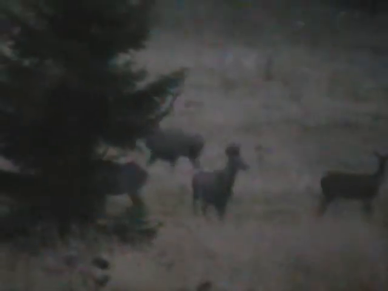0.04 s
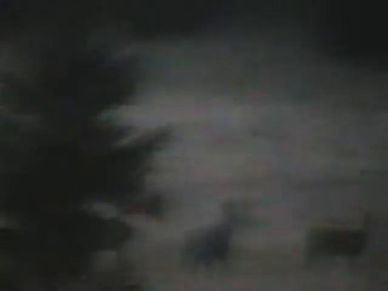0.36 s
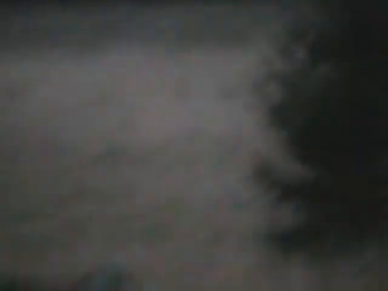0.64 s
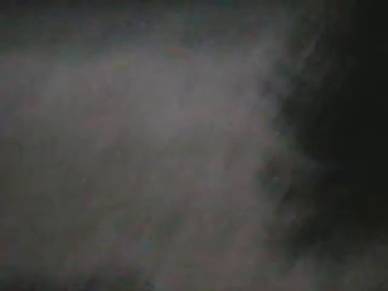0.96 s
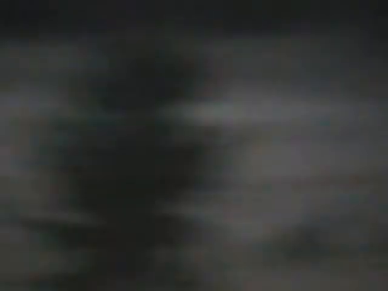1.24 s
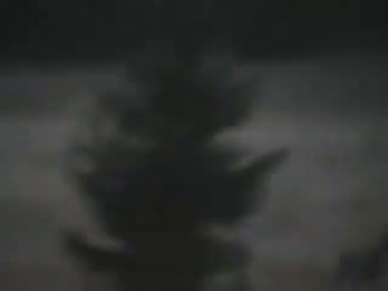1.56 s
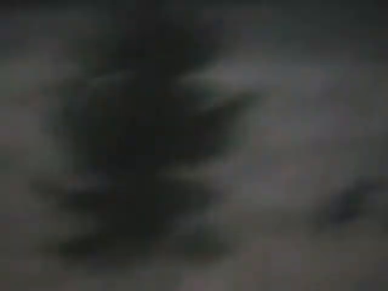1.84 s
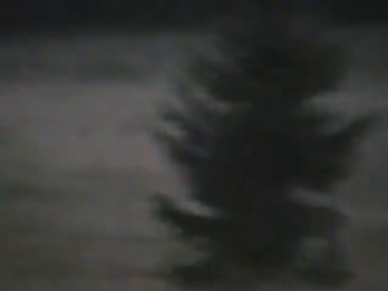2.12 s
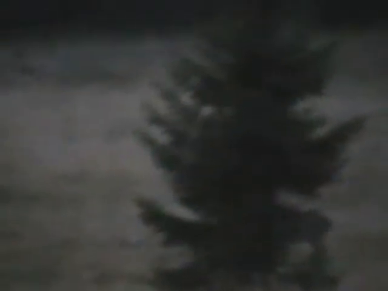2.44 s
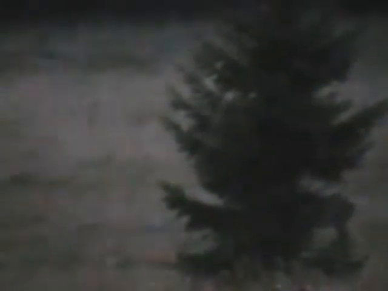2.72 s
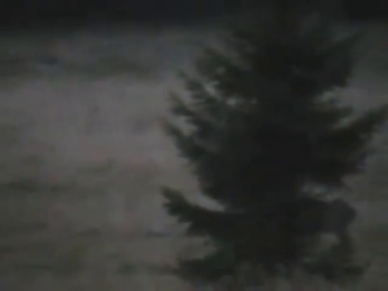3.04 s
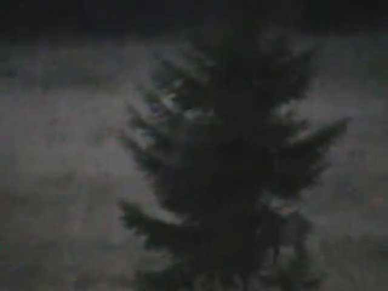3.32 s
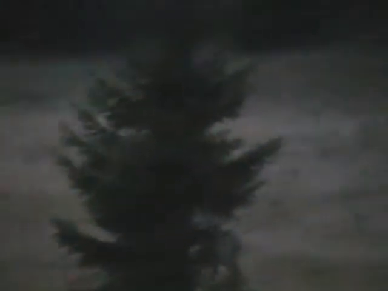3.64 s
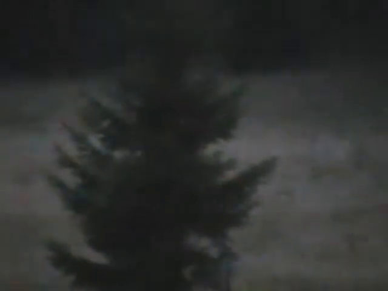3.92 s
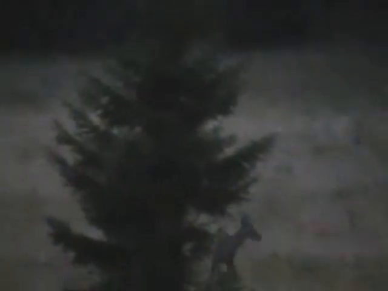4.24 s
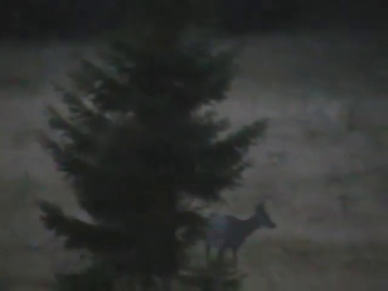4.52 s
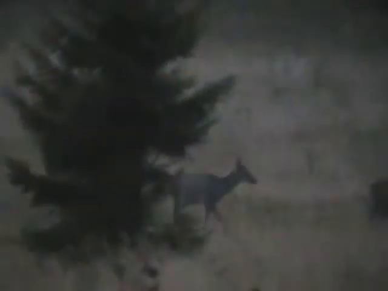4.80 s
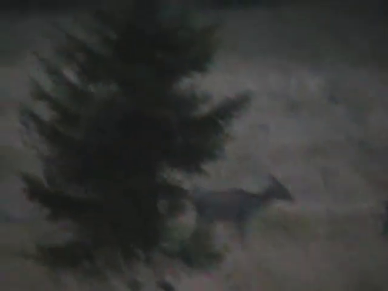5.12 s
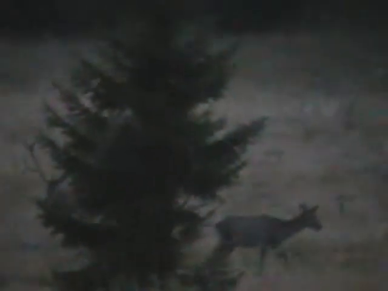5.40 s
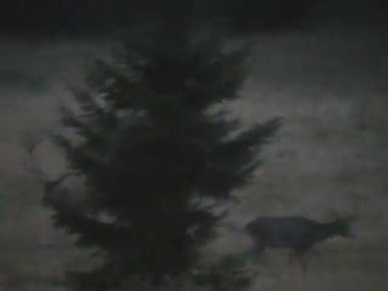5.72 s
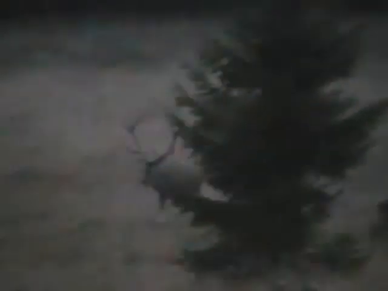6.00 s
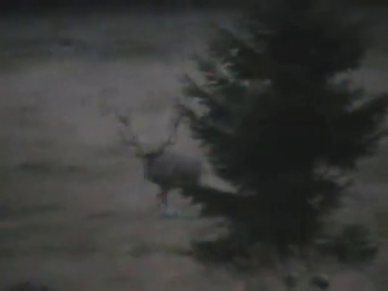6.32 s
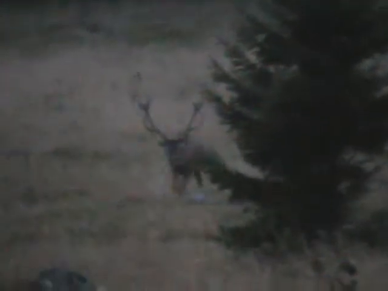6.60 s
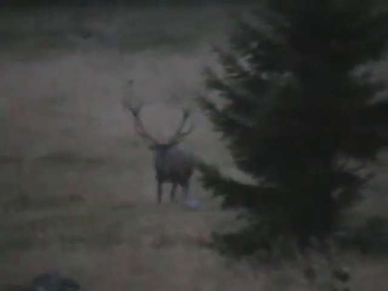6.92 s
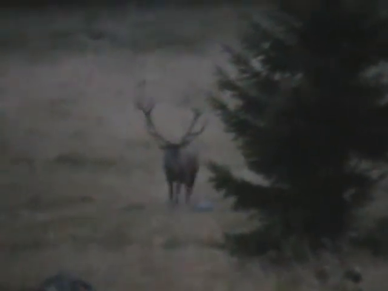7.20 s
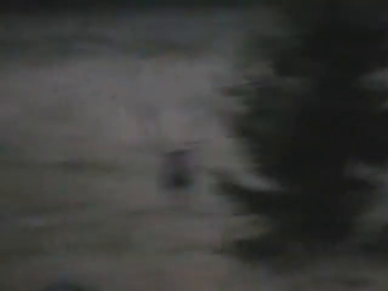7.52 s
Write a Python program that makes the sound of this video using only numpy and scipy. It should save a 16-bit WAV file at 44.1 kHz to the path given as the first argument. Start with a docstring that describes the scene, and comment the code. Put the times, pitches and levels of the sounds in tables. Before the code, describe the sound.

Camcorder handling knocks and faint bird whistles in a quiet meadow, followed by a brief creaky deer call over soft whirr and hiss.

```python
"""A hand-held camcorder's tape drive whirrs and ticks; hands bump and rub its resonant housing.
A far bird whistles thinly over a quiet dusk meadow with deer. Then a close creaking rasp swells and
fades: strokes of stick-slip pulses ring narrow resonances, with soft low gliding tones underneath.
A few light knocks follow."""
import sys
import numpy as np
from scipy import signal
from scipy.fft import rfft, irfft, next_fast_len
from scipy.io import wavfile

SR = 44100
rng = np.random.default_rng(int(sys.argv[2]) if len(sys.argv) > 2 else 0)


def bounce(signal):
    """Save signal as a 16-bit WAV file at the path given by the first command-line argument."""
    frames = np.transpose(np.atleast_2d(signal))
    limited = np.clip(frames, -1, 1)
    pcm = np.round(limited * 32767).astype(np.int16)
    wavfile.write(sys.argv[1], SR, pcm)


N = 341775
TIME = np.arange(N) / SR

# creak strokes: t/s, length/s, level/dB, swell/dB, treble/(dB/octave), first slip rate/Hz,
# last slip rate/Hz, unevenness/0-1
CREAK_STROKES = [(2.881, .2, -59.5, -1, -6, 66.1, 64.6, 0.038),
                 (3.0892, 0.07, -52.5, -9, -12, 72.2, 72.1, 0.036),
                 (3.209, 0.081, -55, 12, 2, 131, 142.3, 0.66), (3.2903, .012, -36.5, -1, 1.5, 72, 72, 0),
                 (3.305, 0.079, -42, 0, 0.5, 73.14, 70.9, 0.0037),
                 (3.3889, 0.053, -41.5, 0, -4.5, 138.2, 123.4, .1),
                 (3.4501, 0.022, -41, -4, -4, 122.4, 116.4, 0.077),
                 (3.4751, 0.025, -40, 4, 2, 113.3, 101.1, .02),
                 (3.5038, 0.047, -46.5, -8, -1.5, 97.2, 85.2, .05),
                 (3.5589, 0.07, -44.5, 3, -2, 84.6, 77, 0.0094),
                 (3.6345, 0.047, -46, -12.5, -1.5, 75.7, 73.9, 0.16)]
# creak resonances, main and nasal: f/Hz, width/Hz, gain/dB
RASP_MODES = [(1578, 13, -4), (1671, 38, 3.5), (1880, 32, 0), (1945, 28, -0.5), (2020, 47, -1),
              (2317, 27, 2), (2470, 67, -7), (2643, 23, -5), (2743, 20, -4.5), (3136, 57, -9.5),
              (3308, 17, -9), (3623, 72, -16.5), (4100, 33, -15.5), (4470, 49, -18.5), (4880, 110, -20.5),
              (5650, 85, -29), (6160, 320, -25)]
NOSE_MODES = [(867, 74, -15), (1190, 33, -11)]
# path of the creak's bright resonance: t/s, f/Hz, gain/dB
BITE_PATH = [(3.29, 4570, -24), (3.41, 4350, -24), (3.495, 5350, -18.5), (3.53, 4970, -31),
             (3.689, 5030, -34)]
# gliding notes: t/s, length/s, first f/Hz, last f/Hz, relative level/dB
SQUEAL_NOTES = [(2.872, .26, 1080, 935, -65), (2.88, .27, 1790, 1600, -61), (2.875, .23, 2320, 1950, -60.5)]
SINGING_NOTES = [(3.33, 0.068, 2760, 2780, -54), (3.443, .15, 2352, 2300, -48),
                 (3.604, 0.057, 2590, 2675, -52), (3.635, 0.08, 2750, 2810, -57)]
GROAN_NOTES = [(3.691, 0.18, 496, 485, -56), (3.856, 0.131, 480, 444, -60)]
LOW_NOTES = [(2.866, 0.069, 180.4, 167, -66), (3.077, 0.13, 153, 187, -70), (3.325, 0.25, 438, 331, -69.5),
             (3.512, 0.15, 185.6, 153.5, -59), (3.665, 0.1, 162.5, 211, -66.5),
             (3.929, 0.14, 268, 164.8, -74.5)]
BIRD_NOTES = [(0.876, 0.17, 7860, 7440, -66), (1.011, 0.18, 7670, 7230, -65),
              (1.146, 0.11, 7050, 6500, -58), (1.552, 0.075, 7570, 7400, -62.5),
              (1.682, 0.069, 7480, 7350, -65.5), (1.772, .11, 7200, 7140, -68.5),
              (1.942, 0.061, 7400, 7450, -68), (2.397, 0.68, 7600, 7030, -75)]
# knocks on the housing: t/s, peak level/dB, low f/Hz, high f/Hz, click re peak/dB
HOUSING_KNOCKS = [(.312, -30.5, 900, 1970, -33), (.396, -30, 885, 5770, -21),
                  (0.4601, -15.5, 295, 1370, -20), (0.477, -24, 254, 1370, -28),
                  (.502, -25.5, 220, 1260, -15), (.593, -30.5, 2420, 3400, 2.5),
                  (0.672, -33, 700, 2200, -16), (0.741, -31.5, 882, 6100, -24), (0.754, -28, 524, 2400, -8),
                  (.799, -29.5, 710, 3000, -11), (.840, -16.5, 326, 1390, -5), (.859, -19.5, 169, 865, -7),
                  (0.8607, -26, 1200, 4970, 0.5), (0.862, -17, 487, 1900, -16),
                  (1.237, -34.5, 704, 4130, -12), (1.452, -37.5, 350, 1170, -7),
                  (1.621, -27.5, 247, 1380, -8.5), (1.818, -47, 284, 450, -23),
                  (1.904, -26, 1060, 2690, -24), (3.655, -37, 477, 790, -23),
                  (4.211, -36.5, 200, 3000, -27), (4.917, -41.5, 300, 4030, 0),
                  (5.743, -41.5, 276, 503, -30), (5.750, -32.5, 515, 770, -14),
                  (5.955, -51.5, 350, 650, -20), (7.71, -40.5, 226, 1020, -9)]
# resonances of the housing and of a hard contact edge: f/Hz, width/Hz, gain/dB
HOUSING_MODES = [(211, 54, 7.5), (394, 410, 8.5), (787, 220, 2.5), (1060, 100, 1.5), (1376, 30, 5),
                 (1680, 490, 7.5), (2180, 300, -6), (3050, 1600, -1.5), (3800, 72, -1), (5560, 510, 5),
                 (9300, 730, -3)]
EDGE_MODES = [(3660, 740, 4), (4100, 380, -11), (5930, 690, -8.5), (8560, 2600, -13), (11800, 2500, -16)]
# small parts ringing after a knock: t/s, f/Hz, level/dB, decay/s
PART_RINGS = [(.593, 4190, -33.5, 0.003), (0.839, 1100, -13.5, 0.0022), (0.8624, 1500, -16.5, 0.0014),
              (0.859, 94, -45, 0.012), (1.621, 3120, -29.5, 0.0012), (5.750, 760, -56.5, 0.049)]
# finger slides: t/s, length/s, relative level/dB, low-pass f/Hz
FINGER_SLIDES = [(0.18, 1.92, -62.5, 6040), (0.351, 0.068, -45.5, 4970), (0.386, 0.12, -49.5, 9000),
                 (0.566, 0.21, -49.5, 9000), (0.88, 0.11, -57, 8000), (0.946, 0.016, -47.5, 9000),
                 (1.026, 0.077, -49, 7900), (1.33, 0.19, -60, 8300), (3.662, 0.14, -50.5, 2440),
                 (3.758, 0.048, -53.5, 2610)]
# fingertip brushes and palm rubs: t/s, length/s, relative level/dB
TIP_BRUSHES = [(.823, 0.0074, -57), (0.858, 0.0026, -51), (0.956, 0.011, -55)]
PALM_RUBS = [(0.2, 1.55, -68), (0.43, 0.26, -54), (0.95, 0.26, -59), (1.315, 0.24, -57.5),
             (3.661, 0.19, -56), (4.322, 0.61, -69.5), (7.3, 1.2, -70.5)]
# noise spectra of fingers, cupped palm, drive whirr, hiss and port rumble: f/Hz, relative level/dB
FINGER_SPECTRUM = [(190, -6), (500, 3.5), (750, 1.5), (1200, 5), (1850, 3.5), (2400, -1.5), (4200, -9.5),
                   (7000, -11.5), (15000, -16)]
PALM_SPECTRUM = [(45, -29), (125, -21), (200, -7), (290, -7.5), (370, -5.5), (480, -2), (560, -7.5),
                 (700, -12.5), (1100, -22.5)]
WHIRR_SPECTRUM = [(15, -54), (25, -25.5), (119, -14), (140, -14), (178, -13.5), (505, -9), (592, -11),
                  (977, -8.5), (1240, -9.5), (1320, -3.5), (1750, -11), (1970, -9), (3000, -10.5),
                  (3900, -51), (6600, -120)]
HISS_SPECTRUM = [(1760, -13), (3000, -17), (3310, -1.5), (3890, -3.5), (4630, 0), (4930, -5.5),
                 (5290, -7.5), (6260, -2.5), (6760, -7), (7350, -5.5), (9010, -9), (10900, -6.5),
                 (11800, -10), (13300, -10.5), (16000, -14.5)]
RUMBLE_SPECTRUM = [(25, -16), (150, -1.5), (1500, -3.5), (4000, -13.5)]
# wavering gear whines: f/Hz, width/Hz, level/dB
GEAR_BANDS = [(533.5, 34, -80.5), (1351, 98, -87), (1982, 89, -75.5), (3980, 86, -79), (5040, 90, -78)]
# drive ticks: first t/s, period/s, f/Hz, width/Hz, decay/s, level/dB
DRIVE_TICKS = [(.0345, .04, 4926, 117, 0.012, -64.5), (.036, .04, 4140, 840, 0.0065, -63.5),
               (0.036, .2, 6160, 290, 0.0061, -61), (0.0015, .2, 5000, 4000, 0.0035, -59)]
# tones of the head drum and beating gears, and of the electronics: f/Hz, level/dB
DRUM_TONES = [(150, -81.5), (1338, -71.5), (1349.5, -76), (1650, -75), (1950, -79.5), (2250, -79)]
CIRCUIT_TONES = [(9900, -92), (10503, -82), (11100, -81.5), (12301, -91), (12898, -86), (13501, -83),
                 (14099, -94), (14702, -97), (15628, -86.5)]


def creak_stroke(stroke, scatter_db=5, jitter=.24, grit=.032, grit_decay_s=.014):
    """Stick-slip: sharp slips, each dragging a little grit, ring the resonances."""
    start_s, length_s, db, swell_db, treble_db_per_octave, first_hz, last_hz, uneven = stroke
    along = progress(start_s, length_s)
    push_db = swell_db * (along - .5)
    moving = (TIME >= start_s) & (TIME <= start_s + length_s)
    rate_hz = (first_hz + (last_hz - first_hz) * along) * np.exp(jitter * uneven * drift(150))
    slip_count = np.ceil(np.cumsum(moving * rate_hz) / SR)
    onsets = np.flatnonzero(np.diff(slip_count) > 0)
    slip_db = push_db[onsets] + scatter_db * uneven * rng.standard_normal(200)[:len(onsets)]
    slips = np.zeros(SR // 2)
    slips[onsets - onsets[0]] = from_db(slip_db)
    drag = signal.lfilter([1], [1, -np.exp(-1 / (grit_decay_s * SR))], slips + 1e-18)
    slips += grit * rng.standard_normal(len(slips)) * drag
    bright = bite(slips, start_s) + rasp(slips, treble_db_per_octave)
    out = np.zeros(N)
    out[onsets[0]:][:len(slips)] = butter(bright, 4, [1400, 7200], "band") + body(slips, NOSE_MODES)
    power = np.mean(moving * from_db(2 * (db + push_db)))
    return rms_one(out) * np.sqrt(power)


def rasp(slips, treble_db_per_octave, tilt_from_hz=1700):
    """Close modes swing in opposition, leaving deep valleys between clusters."""
    out, sign, previous_hz = 0, 1, 0
    for hz, width_hz, db in RASP_MODES:
        if hz < 1.1 * previous_hz:
            sign = -sign
        tilt_db = treble_db_per_octave * max(np.log2(hz / tilt_from_hz), 0)
        out += sign * from_db(db + tilt_db) * resonate(slips, hz, width_hz)
        previous_hz = hz
    return out


def bite(slips, start_s, width_hz=300):
    """Bright contact resonance; climbs as the creak tightens."""
    path_s, path_hz, path_db = np.transpose(BITE_PATH)
    now_s = start_s + TIME[:len(slips)]
    radius = np.exp(-np.pi * width_hz / SR)
    phasor = np.exp(2j * np.pi * np.cumsum(np.interp(now_s, path_s, path_hz)) / SR)
    baseband = signal.lfilter([1 - radius], [1, -radius], slips / phasor + 1e-18)
    return from_db(np.interp(now_s, path_s, path_db)) * 2 * np.real(phasor * baseband)


def squeal(throb_depth=.69):
    """Sinking partials throb at the first stroke's initial slip rate."""
    partials = gliding_tones(SQUEAL_NOTES, waver=.006, flutter_db=2, bend=.7, arch=.5)
    start_s, *_, slip_hz, _, _ = CREAK_STROKES[0]
    return partials * (1 + throb_depth * np.sin(2 * np.pi * slip_hz * (TIME - start_s)))


def singing():
    """Almost clean tones, as of slips in step with one resonance."""
    return gliding_tones(SINGING_NOTES, waver=.003, flutter_db=1.5, arch=.6)


def groan():
    """Rough hollow tones as the creak lets go."""
    return gliding_tones(GROAN_NOTES, waver=.06, flutter_db=3.5, arch=.6)


def tree_echo(x, gain_db=-8.5, t60_s=2.3, top_hz=1750):
    """Many weak, dull reflections off the trees."""
    tail = rng.standard_normal(SR) * from_db(-60 * TIME[:SR] / t60_s)
    wet = signal.fftconvolve(x, tail / np.linalg.norm(tail))[:N]
    return from_db(gain_db) * butter(wet, 4, top_hz)


def knocks(samples=8192, click_top_hz=4880):
    """Short pushes, each in its own band, ring the housing and small parts; hard edges click."""
    out = np.zeros(N + samples)
    push = signal.unit_impulse(samples) + 1e-18
    click = butter(body(push, EDGE_MODES), 1, click_top_hz)
    click /= np.abs(click).max()
    for start_s, db, low_hz, high_hz, click_db in HOUSING_KNOCKS:
        knock = body(butter(push, 2, [low_hz, high_hz], "band"), HOUSING_MODES)
        knock /= np.abs(knock).max()
        out[round(start_s * SR):][:samples] += from_db(db) * (knock + from_db(click_db) * click)
    age_s = TIME[:samples]
    for start_s, hz, db, decay_s in PART_RINGS:
        envelope = from_db(db) * np.exp(-age_s / decay_s) * (1 - np.exp(-age_s * hz)) ** 2
        out[round(start_s * SR):][:samples] += envelope * np.sin(2 * np.pi * hz * age_s)
    return out[:N]


def hands(finger_gain_db=-5.5, palm_gain_db=-1.5, resting_grip_db=-78):
    """Fingers slide, tips brush brightly; the palm rubs dully and never quite rests."""
    skin = friction(FINGER_SPECTRUM, grain_db=2) + crackles()
    fingers = sum(pressure(rub, attack_s=.014, release_s=.12) * butter(skin, 2, top_hz)
                  for *rub, top_hz in FINGER_SLIDES)
    brushing = sum(pressure(rub, attack_s=.0045, release_s=.0022) for rub in TIP_BRUSHES)
    tips = brushing * noise_band(hz=8300, width_hz=11000)
    palm_power = sum(pressure(rub, attack_s=.029, release_s=.086) ** 2 for rub in PALM_RUBS)
    grip = from_db(palm_gain_db) * np.sqrt(palm_power) + from_db(resting_grip_db)
    return tips + from_db(finger_gain_db) * fingers + grip * friction(PALM_SPECTRUM, grain_db=2.5)


def pressure(rub, attack_s, release_s):
    """A rub builds, holds and dies away."""
    start_s, length_s, db = rub
    attack = 1 - np.exp(-np.clip(TIME - start_s, 0, length_s) / attack_s)
    return from_db(db) * attack * np.exp(-np.maximum(TIME - start_s - length_s, 0) / release_s)


def friction(spectrum, grain_db):
    """Skin catches and lets go in tiny uneven grains."""
    grains = rng.standard_normal(N) * from_db(grain_db * drift(450) + .61 * drift(30))
    return coloured(grains, spectrum)


def crackles(rate_hz=220, spread_db=2.5, gain_db=-7.5):
    """Sparse skin catches of uneven size."""
    sizes = from_db(spread_db * np.minimum(rng.exponential(1, N), 2)) * rng.choice([-1, 1], N)
    catches = sizes * (rng.random(N) < rate_hz / SR)
    return from_db(gain_db) * coloured(catches, FINGER_SPECTRUM)


def low_glides():
    """Soft wavering tones under the creak."""
    return gliding_tones(LOW_NOTES, waver=.02, flutter_db=1.5)


def bird(gain_db=-3, echo_db=-13, echo_s=.06):
    """Thin whistles hold, then bend; one echo off the trees."""
    song = gliding_tones(BIRD_NOTES, waver=.005, flutter_db=3, bend=1.4, arch=.6)
    return from_db(gain_db) * (song + from_db(echo_db) * np.interp(TIME - echo_s, TIME, song))


def tape_drive(whirr_db=-65, hiss_db=-67.5):
    """Whirr, hiss, gear whines and a tick per frame."""
    out = from_db(whirr_db) * coloured(rng.standard_normal(N), WHIRR_SPECTRUM)
    out += from_db(hiss_db) * coloured(rng.standard_normal(N), HISS_SPECTRUM)
    for hz, width_hz, db in GEAR_BANDS:
        out += from_db(db) * noise_band(hz, width_hz)
    for first_s, period_s, hz, width_hz, decay_s, db in DRIVE_TICKS:
        burst = np.exp(-((TIME - first_s) % period_s) / decay_s)
        out += from_db(db) * burst * rms_one(resonate(rng.standard_normal(N), hz, width_hz))
    return out


def steady_tones(flutter_db=1):
    """Head drum, gears and electronics sing at constant pitch."""
    return sum(np.sqrt(2) * from_db(db + flutter_db * drift(11)) * np.sin(2 * np.pi * hz * TIME)
               for hz, db in [*DRUM_TONES, *CIRCUIT_TONES])


def drum_notches(x, spacing_hz=300, depth=.23, memory=.73):
    """The camera subtracts what repeats with its drum: narrow notches, faint quick echoes."""
    lag = round(SR / spacing_hz)
    periods = np.pad(x, (0, -N % lag)).reshape(-1, lag)
    repeating = signal.lfilter([0, depth], [1, -memory], periods, axis=0)
    return x - repeating.ravel()[:N]


def gliding_tones(notes, waver, flutter_db, bend=1, arch=1):
    """Unsteady sines swell and fade as they glide; bend > 1 glides late."""
    out = np.zeros(N)
    for start_s, length_s, first_hz, last_hz, db in notes:
        along = progress(start_s, length_s)
        hz = first_hz + (last_hz - first_hz) * along ** bend
        phase = 2 * np.pi * np.cumsum(hz * (1 + waver * drift(120))) / SR
        swell = np.sin(np.pi * np.minimum(along, 1 - along)) ** arch
        out += np.sqrt(2) * np.sin(phase) * from_db(db + flutter_db * drift(40.38)) * swell
    return out


def coloured(x, spectrum, skirt_db_per_octave=60):
    """Shape a noise's spectrum, falling off past its ends; unit power."""
    hz, db = np.transpose(spectrum)
    size = next_fast_len(N)
    octave = np.log2(np.maximum(np.arange(size // 2 + 1) * SR / size, 1))
    beyond = np.abs(octave - np.clip(octave, np.log2(hz[0]), np.log2(hz[-1])))
    gain = from_db(np.interp(octave, np.log2(hz), db) - skirt_db_per_octave * beyond)
    return rms_one(irfft(rfft(x, size) * gain, size)[:N])


def noise_band(hz, width_hz):
    """Twice-resonated noise; unit power."""
    return rms_one(resonate(resonate(rng.standard_normal(N), hz, width_hz), hz, width_hz))


def body(x, modes):
    """Parallel resonances."""
    return sum(from_db(db) * resonate(x, hz, width_hz) for hz, width_hz, db in modes)


def resonate(x, hz, width_hz):
    """Resonance with unit peak gain."""
    radius = np.exp(-np.pi * width_hz / SR)
    feedback = [1, -2 * radius * np.cos(2 * np.pi * hz / SR), radius ** 2]
    return signal.lfilter(np.array([1, 0, -1]) * (1 - radius ** 2) / 2, feedback, x + 1e-18)


def butter(x, order, hz, kind="low"):
    """Maximally flat filter."""
    return signal.sosfilt(signal.butter(order, hz, kind, fs=SR, output="sos"), x)


def drift(rate_hz):
    """Random wander, unit spread."""
    knots = rng.standard_normal(4000)
    return np.interp(TIME * rate_hz, np.arange(len(knots)), knots) * np.sqrt(3 / 2)


def progress(start_s, length_s):
    """0-1 ramp over an event."""
    return np.clip((TIME - start_s) / length_s, 0, 1)


def rms_one(x):
    """Scale to unit power."""
    return x / np.sqrt(np.mean(x ** 2) + 1e-20)


def from_db(db):
    """Decibels to gain."""
    return 10 ** (np.asarray(db) / 20)


def scene(port_lag_s=.0011, rumble_db=-73.5):
    """Two close microphone ports; only near sounds and a faint rumble differ between them."""
    creak = sum(creak_stroke(stroke) for stroke in CREAK_STROKES) + squeal() + singing()
    glides, groaning = low_glides(), groan()
    near = drum_notches(knocks() + hands() + creak + tree_echo(creak) + groaning)
    middle = near + drum_notches(glides + bird() + tape_drive()) + steady_tones()
    side = from_db(-31) * near + from_db(-24) * np.interp(TIME - port_lag_s, TIME, near)
    side += from_db(rumble_db) * coloured(rng.standard_normal(N), RUMBLE_SPECTRUM)
    return np.array([middle + side, middle - side])


def record(dry):
    """Steep treble cut."""
    cutoff_hz = 15780
    return signal.sosfilt(signal.ellip(12, .1, 70, cutoff_hz, fs=SR, output="sos"), dry)


dry = scene()
out = record(dry)
bounce(out)
```